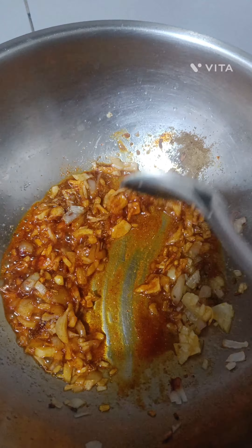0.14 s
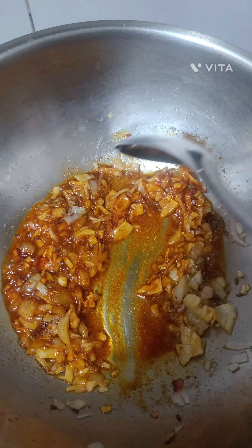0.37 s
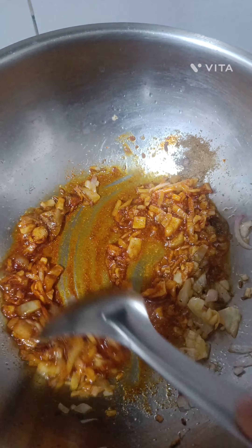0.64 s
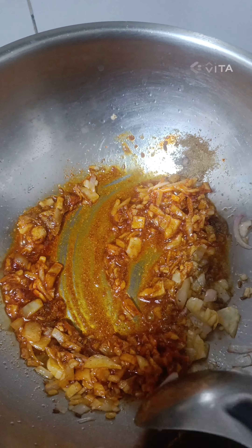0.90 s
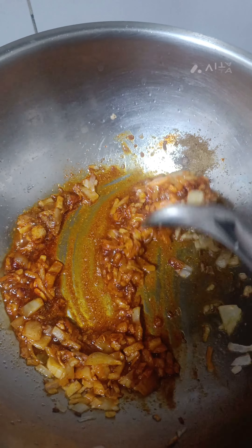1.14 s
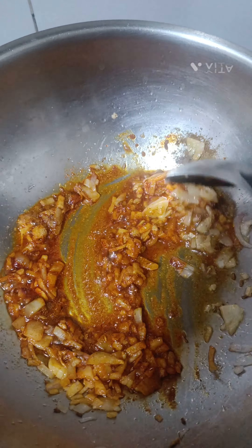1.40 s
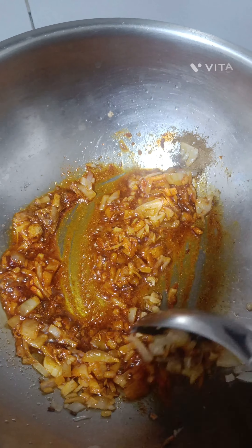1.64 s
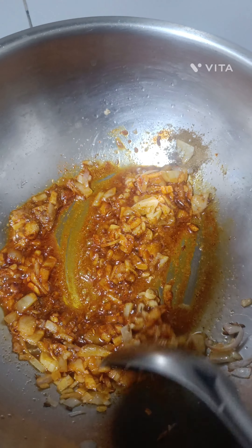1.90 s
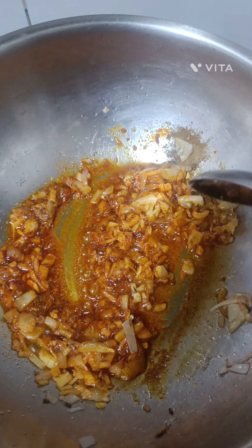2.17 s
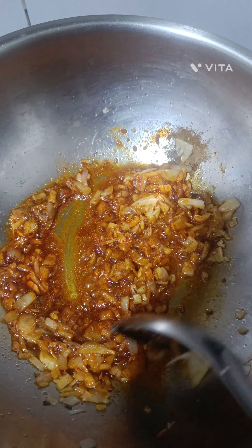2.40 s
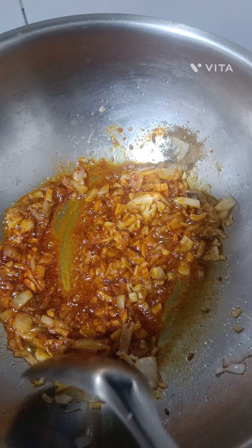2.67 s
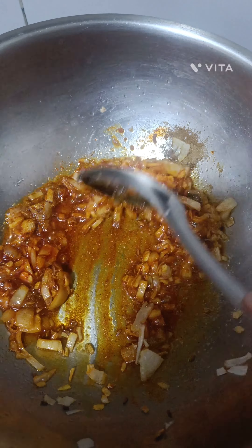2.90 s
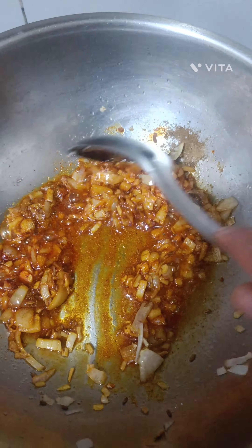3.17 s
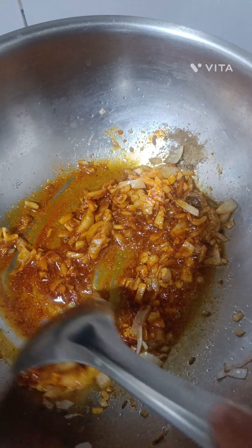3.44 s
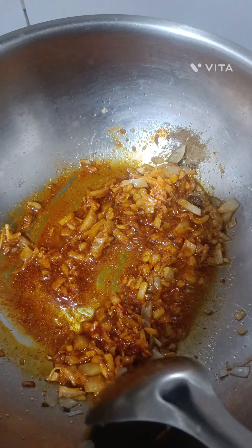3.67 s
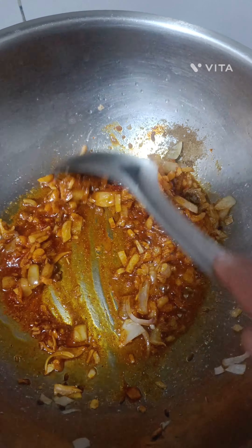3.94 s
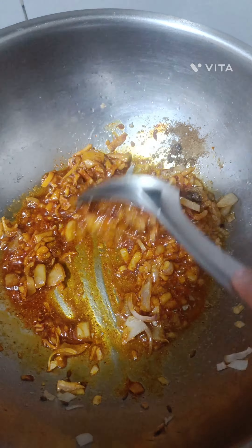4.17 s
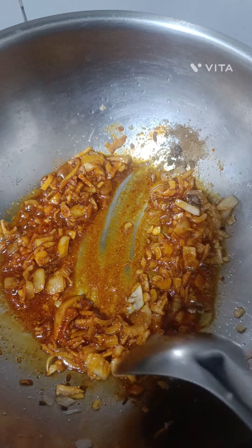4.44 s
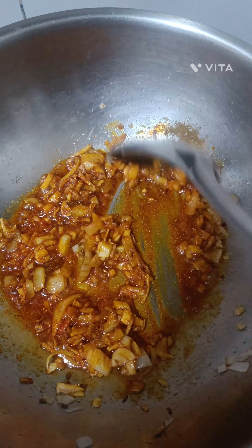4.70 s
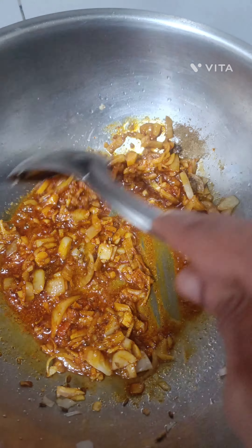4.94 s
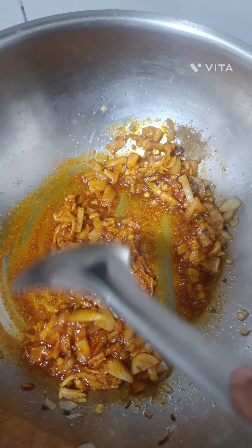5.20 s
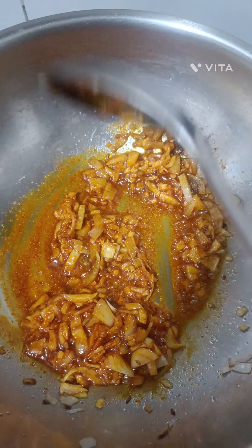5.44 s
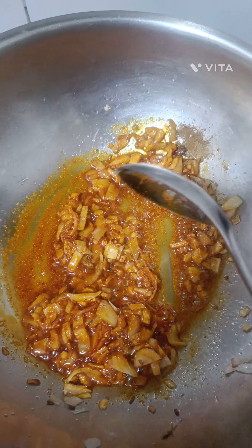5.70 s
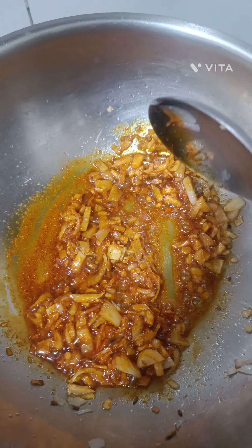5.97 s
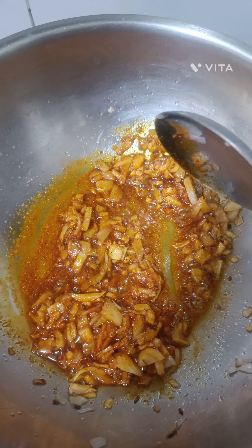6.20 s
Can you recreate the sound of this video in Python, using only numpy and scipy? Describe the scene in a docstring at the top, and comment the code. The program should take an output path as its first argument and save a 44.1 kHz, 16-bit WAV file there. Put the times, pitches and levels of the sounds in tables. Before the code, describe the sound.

A steel ladle knocks, clacks and briefly scrapes on a thin steel pan, with low booms and ringing, over a soft steady oil sizzle.

```python
"""A steel ladle knocks and scrapes on a thin steel pan while stirring chopped food, close to a two-port microphone.
Clicks and rubbing grains set the ringing tones of pan and ladle bowl going; hard blows add a crash of noise.
Each push makes pan and stove boom low, built from a few fading low tones.
Behind it the oil sizzles (bands of hiss and fine clicks) and spits (short high rings)."""
import sys
import numpy as np
from scipy import signal
from scipy.fft import rfft, irfft, next_fast_len
from scipy.io import wavfile

SR = 44100
rng = np.random.default_rng(int(sys.argv[2]) if len(sys.argv) > 2 else 0)


def bounce(signal):
    """Save signal as a 16-bit WAV file at the path given by the first command-line argument."""
    frames = np.transpose(np.atleast_2d(signal))
    limited = np.clip(frames, -1, 1)
    pcm = np.round(limited * 32767).astype(np.int16)
    wavfile.write(sys.argv[1], SR, pcm)


def volts_from_db(level):
    """Convert decibel levels to linear amplitude ratios."""
    exponent = np.asarray(level, float) / 20
    return 10 ** exponent


N = 279573

# knocks of the ladle edge on steel: t/s, strength at the centre pitch/dB, centre pitch of the contact f/Hz,
# fall away from it/dB per octave, level of the humming rim/dB
KNOCKS = [(0.2574, -11, 1910, 6.5, -39), (0.3326, -33, 700, 2, -37.5), (0.385, -31, 1210, 5, -39),
          (0.4209, -31, 1160, 12, -56), (0.7043, -42, 990, 7, -47.5), (0.7404, -23, 537, 29, -51),
          (0.7644, -41.5, 2430, 15.5, -62), (0.853, -28.5, 1140, 15, -62), (0.9616, -32.5, 1380, 12, -70),
          (0.9744, -35.5, 1170, 31, -83), (1.258, -24, 1170, 8, -56.5), (1.2615, -31, 2420, 13, -70),
          (1.2794, -26, 1100, 36, -68), (1.4605, -40, 950, 20, -80), (1.7127, -12.5, 590, 8, -37),
          (1.721, -33.5, 2400, 30, -67), (1.7459, -39, 850, 10, -35.5), (1.8808, -29.5, 1190, 25, -37.5),
          (2.1888, -12.5, 4200, 5.5, -38), (2.5001, -18, 556, 29, -39), (2.615, -29, 556, 8, -73),
          (2.6403, -26, 570, 29, -74), (2.6783, -38, 600, 9, -74), (3.0011, -38, 830, 8.5, -77),
          (3.1339, -23.5, 2430, 20, -86), (3.15, -31, 1210, 20, -77), (3.1716, -26, 1400, 9, -71),
          (3.5013, -30, 524, 26, -62), (3.5448, -29, 553, 23, -71), (4.0075, -12, 1240, 8, -62),
          (4.0394, -27, 547, 12, -43), (4.119, -32.5, 900, 3, -40), (4.1694, -44, 554, 1, -49),
          (4.8229, -10.5, 3500, 5.5, -56), (5.2739, -15.5, 547, 21.5, -56)]


def rms_one(x):
    """Scale to an average (rms) size of 1."""
    return x / np.sqrt(np.mean(x ** 2) + 1e-20)


def at_hz(points, hz):
    """Read a (Hz, value) table on a log-frequency axis."""
    table = np.array(points)
    return np.interp(np.log(hz), np.log(table[:, 0]), table[:, 1])


def band(x, low_hz, high_hz):
    """Let only the pitches between two limits pass."""
    limits = [low_hz, min(high_hz, .45 * SR)]
    return signal.sosfilt(signal.butter(2, limits, "band", fs=SR, output="sos"), x)


def drift(rate_hz):
    """Slow random wandering of spread 1: smoothed noise, drawn at every 40th sample."""
    r = np.exp(-2 * np.pi * rate_hz * 40 / SR)
    noise = rng.standard_normal(N // 40 + 2002)
    slow = signal.lfilter([1], [1, -2 * r, r * r], noise)[2000:]  # skip the settling of the filter
    return np.interp(np.arange(N) / 40, np.arange(len(slow)), rms_one(slow))


def ring(clicks, hz, t60_s):
    """A resonance: a unit click sets off a sine of height 1 that falls by 60 dB in t60_s."""
    r = np.exp(-np.log(1000) / (t60_s * SR))
    w = 2 * np.pi * hz / SR
    return signal.lfilter([0, np.sin(w)], [1, -2 * r * np.cos(w), r * r], clicks + 1e-18)


def grains(per_s, spread_db):
    """Random clicks of uneven size and either sign, rms 1."""
    sizes = volts_from_db(spread_db * np.minimum(rng.exponential(1, N), 5)) * rng.choice([-1, 1], N)
    return rms_one(sizes * (rng.random(N) < per_s / SR))


def sides(left_right_db):
    """Gains for left and right that differ by so many dB."""
    return volts_from_db(np.multiply.outer([.5, -.5], left_right_db))


def two_ports(x):
    """Sound from the pan reaches the left port first; each port colours it in its own way."""
    # how far the left port leads: f/Hz, phase/radians
    port_lead = [(0, 0), (780, 1.05), (2500, 5), (4310, 6.5), (5680, 12.7), (7410, 12), (8960, 13),
                 (12900, 6.5), (16400, 7)]
    # how much louder the left port is: f/Hz, left-right/dB
    port_balance = [(300, 0.5), (700, 0.5), (1290, 2.5), (2380, 1.5), (4400, -7.5), (8120, 3.5), (15000, 3)]
    size = next_fast_len(N + 512)
    hz = np.arange(size // 2 + 1) * SR / size
    lead = np.interp(hz, *np.transpose(port_lead))
    lag = np.exp(-1j * np.outer([0, 1], lead))  # only the right port lags
    port = sides(at_hz(port_balance, hz + 1)) * lag
    return irfft(rfft(x, size) * port, size)[:, :N]


def sizzle(patchy_db=2.2, fizz_share=0.075):
    """Hot oil: third-octave bands of hiss mixed with fine bubble clicks, each band wavering a little."""
    # colour of the hiss: f/Hz, relative level per Hz/dB
    colour = [(18, -59), (30, -3), (103, 3), (221, -1.5), (280, -11), (554, -2), (801, -2.5), (988, -8),
              (1810, -9), (2290, -8.5), (3220, -6), (4300, -10), (6550, -4), (8520, -17), (16000, -11)]
    # level between 2.5 and 15 kHz: t/s, level/dB
    level_points = [(0.0, -52), (0.39, -51.5), (2.22, -52), (2.44, -55), (4.34, -52), (5.44, -54.5),
                    (6.34, -54)]
    # how alike left and right are: f/Hz, likeness (1 = same)
    likeness = [(60, 0.87), (130, 1), (290, 0.67), (640, 0.34), (1410, 0.027), (3100, 0.049), (6820, 0.27),
                (15000, 0.53)]
    # balance of the sides: f/Hz, left-right/dB
    balance = [(60, -2.5), (130, 4.5), (290, -5.5), (640, 0), (1410, 6.5), (3100, 0), (6820, 3.5),
               (15000, 6.5)]
    out, together = 0, drift(3)
    edges_hz = 30 * 2 ** np.arange(0, 9.3, 1 / 3)
    white = rng.standard_normal((2, 2, N))
    white[:, 0] += fizz_share * grains(1500, spread_db=2.0)
    for k, (low, high) in enumerate(zip(edges_hz, edges_hz[1:])):
        mid, side = band(white[k % 2], low, high)  # neighbouring bands use different noise
        hz = np.sqrt(low * high)
        alike = np.clip(at_hz(likeness, hz), -.98, .98)
        waver_db = patchy_db * (0.22 * together + drift(21))
        gain = volts_from_db(at_hz(colour, hz) + waver_db)
        pair = np.sqrt(1 + alike) * mid + np.sqrt(1 - alike) * side * [[1], [-1]]
        out = out + gain * pair * sides(at_hz(balance, hz))[:, None]
    out = rms_one(out)
    s, level_db = np.transpose(level_points)
    level = volts_from_db(np.interp(np.arange(N) / SR, s, level_db))
    return out * level / np.std(band(out, 2500, 15000))


def after_ring(x, alike_below_hz=400):
    """Countless weak modes and wall echoes: the sound is smeared by noise that dies band by band."""
    # dense ring of pan and walls: f/Hz, time to fall by 60 dB/s
    fade_times = [(100, 0.24), (260, 0.41), (700, 0.35), (1840, 0.41), (4850, 0.35), (12800, 0.31)]
    t = np.arange(SR // 2) / SR
    edges_hz = 60 * 2 ** np.arange(0, 8.6, .5)
    shared, *own = rng.standard_normal((3, len(t)))
    response = 0
    for low, high in zip(edges_hz, edges_hz[1:]):
        # long waves reach both ports alike
        alike = np.clip(0.093 + 0.925 / (1 + (low / alike_below_hz) ** 2), 0, 1)
        white = np.sqrt(alike) * shared + np.sqrt(1 - alike) * np.array(own)
        fade = np.exp(-np.log(1000) * t / at_hz(fade_times, np.sqrt(low * high)))
        response = response + band(white, low, high) * fade
    response = response / np.sqrt(np.sum(response ** 2) / 2)
    return signal.fftconvolve(x, response, axes=1)[:, :N]


def spits(cycles=16.0):
    """A bursting fat bubble rings at its own pitch, falling by 60 dB within a few cycles."""
    # loud bursts, before the ports colour them: t/s, level/dB, f/Hz, left-right/dB
    bursts = [(0.077, -32, 6440, 21), (0.0867, -30, 6500, -8), (1.4087, -29, 5800, -3),
              (2.9005, -36, 6710, 1), (3.2773, -28, 9700, 14), (3.3907, -25, 11500, 11),
              (4.2194, -33, 7060, 6), (4.2789, -10, 6130, -1), (4.3654, -47, 6770, 0),
              (4.5974, -37, 2190, 13), (4.6694, -50, 6270, -7), (6.081, -24, 3080, 10)]
    t = np.arange(900) / SR
    out = np.zeros((2, N + len(t)))
    for s, level_db, hz, left_right_db in bursts:
        rise = np.minimum(1, t * hz / 2)  # over two cycles
        fall = np.exp(-np.log(1000) * t * hz / cycles)
        pop = np.sin(2 * np.pi * hz * t) * rise * fall
        start = round(s * SR)
        out[:, start:start + len(t)] += volts_from_db(level_db) * np.outer(sides(left_right_db), pop)
    return out[:, :N]


def stove_boom(reach_octaves=0.36, swell_s=0.0096, t60_s=0.29):
    """Each push rocks the pan on its stand: the low modes nearest its pitch swell and die away."""
    # pushes: t/s, level/dB, centre f/Hz
    pushes = [(0.004, -46.5, 146), (0.262, -21.5, 152), (0.673, -25.5, 172.3), (0.745, -28, 177),
              (0.858, -45.5, 188), (1.247, -19, 150), (1.711, -18.5, 177), (1.801, -25.5, 225),
              (1.925, -46, 215), (2.2, -30.5, 158), (2.502, -34, 176), (2.616, -43.5, 215),
              (2.992, -29.5, 136), (3.148, -48, 145), (3.419, -27.5, 179), (3.503, -27, 202),
              (3.7, -45, 157), (4.011, -18.5, 159.5), (4.131, -39, 175), (4.446, -40, 138),
              (4.826, -24, 186), (5.273, -21.5, 187), (5.33, -44, 166)]
    # low modes of the stove top: f/Hz, relative level/dB
    stove_modes = [(62, 7), (82, 9), (108, 7), (140, 6.5), (158, -0.5), (175, 4), (193, 1), (210, 1.5)]
    t = np.arange(SR) / SR
    out = np.zeros(N + SR)
    shape = (1 - np.exp(-t / swell_s)) * np.exp(-np.log(1000) * t / t60_s)
    shape = shape / shape.max()
    for s, level_db, centre_hz in pushes:
        gains = [volts_from_db(db) / (1 + (np.log2(hz / centre_hz) / reach_octaves) ** 2) for hz, db in stove_modes]
        tone = sum(g * np.sin(2 * np.pi * hz * t) for g, (hz, db) in zip(gains, stove_modes))
        start = round(s * SR)
        out[start:start + SR] += volts_from_db(level_db) * shape * tone / np.hypot.reduce(gains)
    return out[:N]


def scrape_stroke(swing_db=20):
    """Pressure (gain) and brightness of the drag through time; the strongest stroke sets the brightness."""
    # ladle dragged over steel: t of greatest pressure/s, level/dB, time to press on/s, time to let go/s,
    # brightness/dB per octave; pressure climbs and falls by swing_db in those times (2 ms at least)
    strokes = [(0.862, -53.5, .01, 0.044, 4), (0.96, -56.5, .05, 0.088, 2.5), (1.884, -46, 0.079, 0.11, 0),
               (2.179, -36.5, 0.022, 0.0053, 0.5), (2.629, -42, 0.031, 0.12, 5),
               (3.135, -44, 0.065, 0.066, 1), (3.171, -42, 0.024, 0.035, 6), (3.534, -49, 0.13, 0.082, 1),
               (3.624, -51.5, .015, 0.079, -1.5), (4.123, -44, 0.013, 0.054, -3.5),
               (5.277, -38.5, 0.016, .015, 3.5), (5.345, -50.5, 0.034, .015, 2.5)]
    t, gain, bright = np.arange(N) / SR, np.zeros(N), np.zeros(N)
    for s, level_db, press_s, release_s, tilt_db in strokes:
        away = np.maximum((s - t) / max(press_s, .002), (t - s) / max(release_s, .002))
        stroke = volts_from_db(level_db - swing_db * np.minimum(away, 9))
        bright[stroke > gain] = tilt_db
        gain = np.maximum(gain, stroke)
    return gain, bright


def blow_db(hz, top_octaves=0.33):
    """Strength of every knock at one pitch: greatest at the centre of the contact, with a rounded top."""
    _, peak_db, centre_hz, fall_db, _ = np.transpose(KNOCKS)
    away = np.hypot(np.log2(hz / centre_hz), top_octaves) - top_octaves
    return peak_db - fall_db * away


def knock_samples():
    """Sample at which each knock lands."""
    return np.round(np.array(KNOCKS)[:, 0] * SR).astype(int)


def rim_hum(hz=508.5, t60_s=0.94):
    """The free rim of the pan hums on after each knock."""
    clicks = np.zeros(N)
    clicks[knock_samples()] = volts_from_db(np.array(KNOCKS)[:, 4])
    return ring(clicks, hz, t60_s)


def ringing_modes(pressure, bright, modes_db=-11, clack_db=-5, scrape_db=-44, rasp_db=-30, own=0.45):
    """Knocks and scrape grains drive the long modes of the pan and the short ones of the ladle bowl."""
    # long modes of the pan, fall time capped below: f/Hz, level/dB, time to fall by 60 dB/s
    pan_modes = [(337.6, 0, 0.21), (427, 1, 0.12), (530, -18.5, 0.21), (796, -6, 0.15), (953, -9, 0.15),
                 (1028, 3, 0.13), (1145, 2, 0.023), (1225, 1.5, 0.12), (1313, -7, 0.18), (1620, 6.5, 0.12),
                 (1830, 7, 0.078), (1904, -5, 0.45), (1977, -4, 0.18), (2250, -19, 0.4), (2370, -2, 0.13),
                 (3500, -1, 0.067), (3835, -12, 0.4), (4254, -3.5, 0.21), (5075, 8.5, 0.065),
                 (5560, 0, 0.18), (5667, 1.5, 0.18), (5970, -6.5, 0.21), (6160, -1, 0.41), (6500, -9, 0.16),
                 (6760, -2, 0.082), (6705, 10.5, 0.054), (7950, -2, 0.07), (9500, -17.5, .2)]
    # short modes of the ladle bowl: f/Hz, level/dB, time to fall by 60 dB/s
    bowl_modes = [(410, -2, 0.035), (564, 1, 0.05), (798, -2, 0.069), (1120.6, 5, 0.037),
                  (1330, 7.5, 0.012), (2157, 5, 0.012), (2480, 5.5, 0.011), (3100, -15, 0.011),
                  (3580, 3.5, 0.012), (4130, -1.5, 0.018), (6160, -7, 0.12), (6250, 12.5, 0.0061),
                  (7010, 10.5, 0.014), (7570, -21, 0.021)]
    at = knock_samples()
    modes = pan_modes + bowl_modes
    rub = pressure * grains(900, spread_db=3.5) * volts_from_db(3 * drift(30))
    spot_db = rng.normal(0, 1.5, (len(at), len(modes)))  # each blow lands on another spot
    long, short = np.zeros((2, 2, N))
    for k, (hz, level_db, t60_s) in enumerate(modes):
        bowl = k >= len(pan_modes)
        t60_s = min(t60_s, .27 if hz > 1300 else .4)  # the food on the steel cuts long rings short
        # the moving edge finds each mode now more, now less
        rub_db = bright * np.log2(hz / 4000) + 2.6 * drift(14) + (rasp_db if bowl else scrape_db)
        force = rub * volts_from_db(rub_db)
        force[at] += volts_from_db(blow_db(hz) + spot_db[:, k] + (clack_db if bowl else modes_db))
        # close neighbours beat with the mode, the more the higher, partly unlike at the two ports
        depth = .8 * min(1, (hz / 1400) ** 2)
        unlike = np.array([drift(24.4), drift(43)])
        beat = 1 + depth * ((1 - own) * drift(34.5) + own * unlike)
        sound = (-1) ** k * volts_from_db(level_db) * ring(force, hz, t60_s) * beat
        if bowl:
            short += sound
        else:
            long += sound
    return long, short


def crash_and_drag_hiss(pressure, bright, crash_db=-7, hardening=0.79, drag_db=-18.5):
    """Bands of noise: a hard blow spreads into a broad crash, a light tap hardly; the drag hisses dryly."""
    # colour of the crash and the drag: f/Hz, level/dB
    crash_colour = [(400, 0), (620, 2.5), (1000, 1), (1600, 1), (2300, 2.5), (3200, -9.5), (4200, -7.5),
                    (4750, -8), (5700, 11.5), (7000, 0.5), (9000, -2), (14000, 0)]
    at = knock_samples()
    grit = volts_from_db(3.9 * drift(90))  # the drag catches and slips
    strength_db = np.array(KNOCKS)[:, 1] + 12
    rise, fall = np.exp(-1 / (0.00098 * SR)), np.exp(-1 / (0.0036 * SR))  # time constants in s
    crash, drag = 0, 0
    for hz in 400 * 1.2 ** np.arange(21):
        colour_db = at_hz(crash_colour, hz)
        start = np.zeros(N)
        start[at] = volts_from_db(blow_db(hz) + colour_db + crash_db + hardening * strength_db)
        start[at - round(.0045 * SR)] = volts_from_db(-18.0) * start[at]  # the edge grazes just before it lands
        hiss = rms_one(band(rng.standard_normal(N), hz / np.sqrt(1.2), hz * np.sqrt(1.2)))
        burst = signal.lfilter([1 - rise], np.convolve([1, -rise], [1, -fall]), start + 1e-18)
        crash = crash + hiss * burst
        drag = drag + volts_from_db(drag_db + colour_db + bright * np.log2(hz / 4000)) * hiss * pressure * grit
    return crash, drag


def ladle_on_pan():
    """Steel on steel: long rings with the rim's hum, short rings with the drag's hiss, and the crash."""
    pressure, bright = scrape_stroke()
    long, short = ringing_modes(pressure, bright)
    crash, drag = crash_and_drag_hiss(pressure, bright)
    return long + rim_hum(), short + drag, crash


def scene():
    """All but sizzle and long rings feeds the after-ring; the boom skips the ports' colouring; sizzle joins."""
    long, short, crash = ladle_on_pan()
    boom, pops = stove_boom(), spits()
    tail = after_ring(volts_from_db(0.5) * crash + volts_from_db(-6) * short + volts_from_db(-5) * pops + volts_from_db(-2.5) * boom)
    from_pan = two_ports(long + short + crash + pops + tail)
    return from_pan + boom * sides(1.0)[:, None] + sizzle()


def band_limit(x):
    """A steep low-pass at the top of the band."""
    return signal.sosfilt(signal.butter(12, 16810, fs=SR, output="sos"), x)


def record(dry):
    """The deep bass is cut, only the highest peaks are rounded, then the top is cut."""
    x = signal.sosfilt(signal.butter(2, 50, "high", fs=SR, output="sos"), dry)
    x = x / (1 + (x / .93) ** 4) ** .25
    x = signal.sosfilt(signal.ellip(8, .5, 40, 16100, fs=SR, output="sos"), x)
    return band_limit(x)


dry = scene()
out = record(dry)
bounce(out)
```